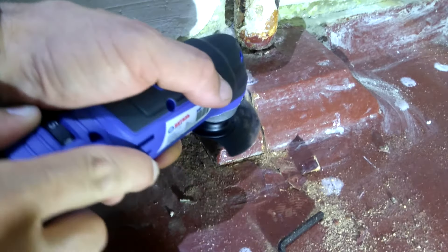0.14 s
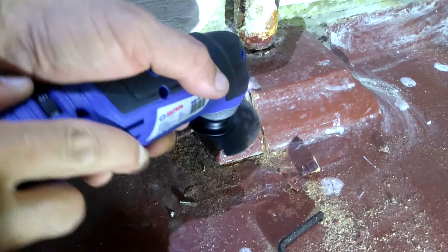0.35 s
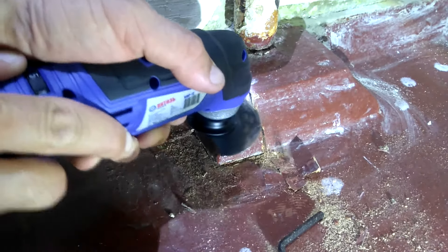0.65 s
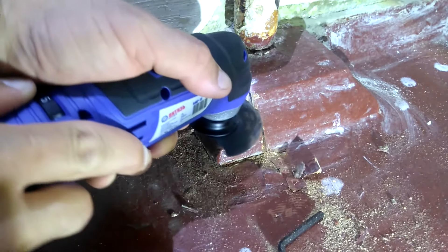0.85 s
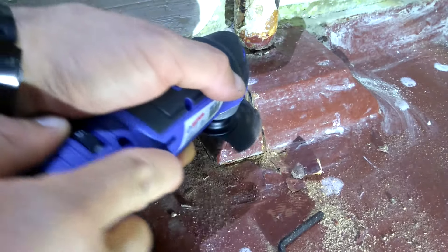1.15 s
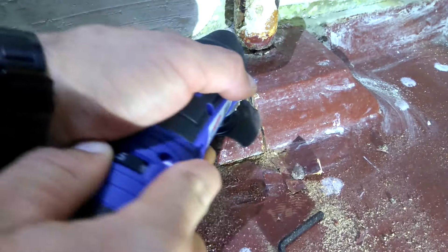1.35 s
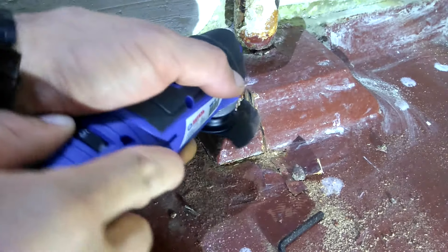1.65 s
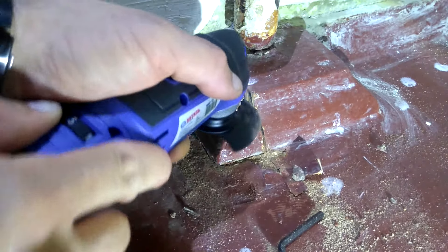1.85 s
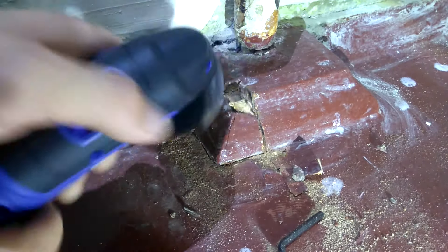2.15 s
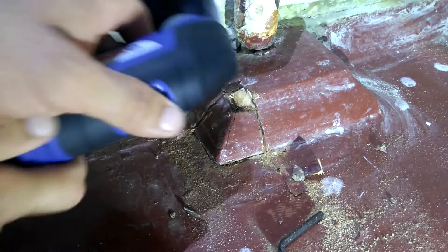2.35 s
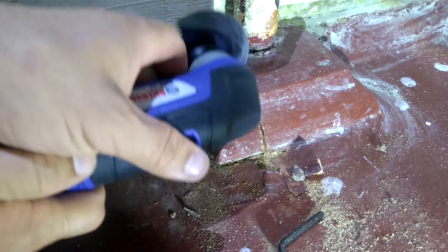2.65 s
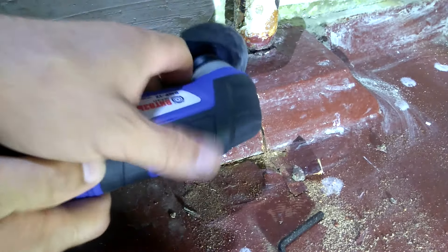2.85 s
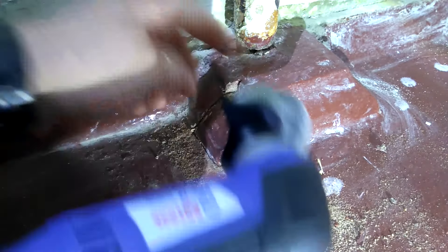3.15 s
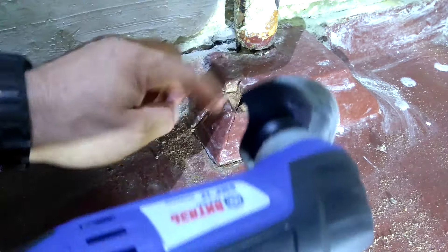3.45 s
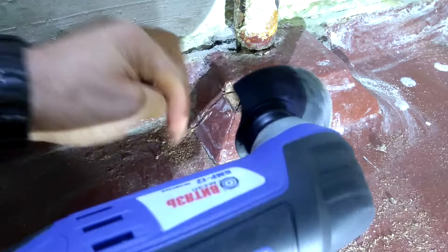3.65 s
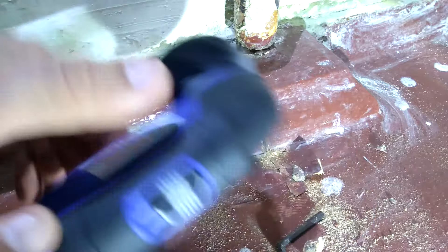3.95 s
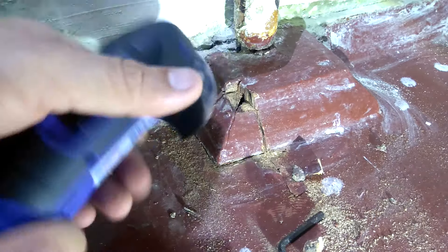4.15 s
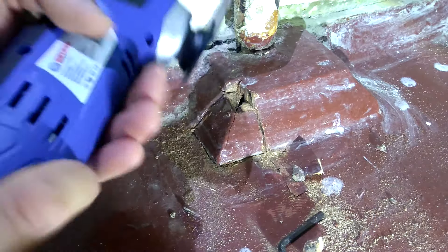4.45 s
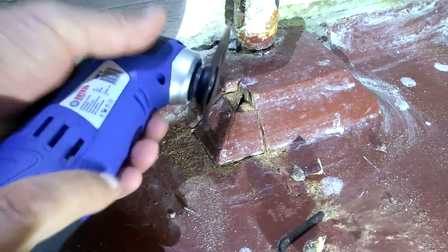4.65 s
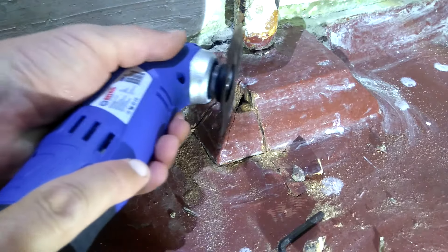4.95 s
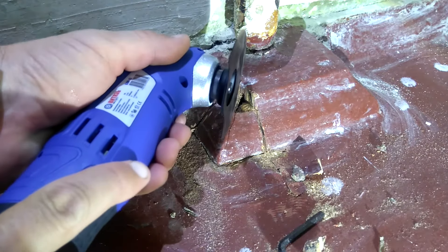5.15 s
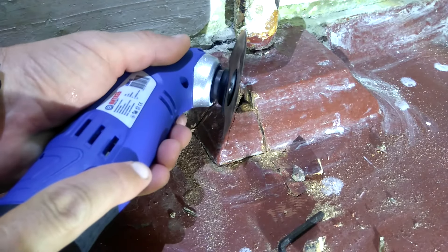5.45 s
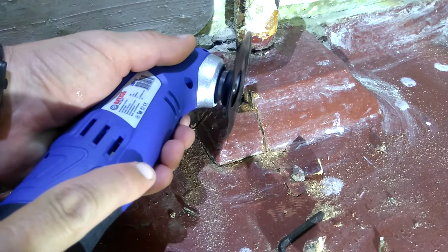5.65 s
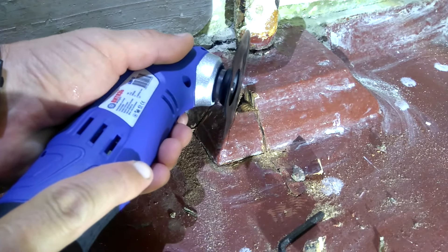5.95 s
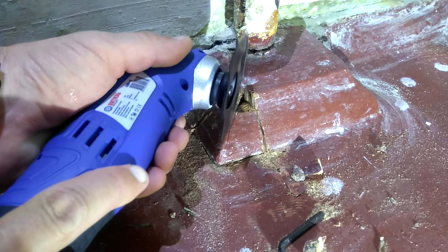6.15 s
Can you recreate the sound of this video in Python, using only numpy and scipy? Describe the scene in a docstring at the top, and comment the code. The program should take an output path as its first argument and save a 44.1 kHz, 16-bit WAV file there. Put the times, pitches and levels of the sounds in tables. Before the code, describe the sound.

Close up, a labouring power saw drones and stutters in wood for two seconds, then snaps free into a higher, steady buzz with shifting whines.

```python
"""An oscillating multi-tool, close by, saws into a floorboard: the motor sags, the blade skids, the board drones.
At about two seconds the blade lifts out with two cracks and the motor speeds up to a free buzz.
The free tool is turned over in the hands, so single tones whine; it bumps and grazes the floor now and then.
Every stroke knocks the drive gear: this gives a stack of tones at multiples of the stroke rate ("orders")
and a pulsing rattle, heard by two spaced microphones in a small bare room over a low rumble."""
import sys
import numpy as np
from scipy import signal
from scipy.fft import rfft, irfft, next_fast_len
from scipy.io import wavfile
from scipy.ndimage import uniform_filter1d

SR = 44100
rng = np.random.default_rng(int(sys.argv[2]) if len(sys.argv) > 2 else 0)


def store_pcm(level_fs):
    """Save levels as 16-bit WAV."""
    pcm = np.round(np.clip(level_fs, -1, 1) * 32767).astype(np.int16)
    wavfile.write(sys.argv[1], SR, np.atleast_2d(pcm).T)


N = 277344

# How the tool is held. Each row: time in seconds, body laid flat (0-1), blade turned on edge (0-1),
# pace of the hand movement (poses per second, before each user's own scaling).
HANDS = [(0, 0, 0, 1.81), (2.1, 0.06, 0.37, 3.62), (2.95, 0.09, 0, 2.36), (3.45, 0.86, 0.28, 1.32),
         (3.95, 0.68, 0.23, 2.13), (4.3, 0, 0.53, 2.656), (4.75, 0.5, 0.5, 1.9), (5.1, 0.17, 1, 0.97),
         (6.29, 0.58, 0.78, 1.26)]
# The five lowest orders. Each row: level in dB when free, level in dB in the wood, dB added by a skid,
# by a graze, by lying flat, by turning on edge, left-right difference in dB, left-right phase in radians.
# The levels are relative to one another.
LOW_ORDERS = [(-42, -18.5, -7.5, 2.5, 1, 4.5, -0.5, 0.74), (-43, -18, -3.5, 6, 10, 7.3, 1.5, 0.49),
              (-33, -22.5, -6, 3.9, 6, 2.196, 4.5, 0.71), (-36, -17, -3, 3.6, 12, 1.4, -2.5, 1.4),
              (-35.5, -24, -5, 8.2, 10.5, 1.6, -2, 1.44)]
# The free blade grazes the floor. Each row: start in seconds, length in seconds,
# sag of the speed in strokes per second, strength (0-1).
GRAZES = [(2.79, 0.21, 8.9, 0.75), (5.191, 0.31, 2.96, 0.24), (5.691, 0.186, 0.794, 0.56),
          (6.107, 0.3, 4.4, 0.27)]

CUTOFF_HZ = 14290
T = np.arange(N) / SR
SLOW_T = np.linspace(0, T[-1], num=3000)   # coarse times for slow changes
FFT_SIZE = next_fast_len(N + 4096)
BINS_HZ = np.maximum(np.arange(FFT_SIZE // 2 + 1) * SR / FFT_SIZE, 1)


def from_db(db):
    """Decibels to gain."""
    return 10 ** (np.asarray(db) / 20)


def rms_one(x):
    """Scale to an average strength (rms) of 1."""
    return x / np.sqrt(np.mean(x ** 2) + 1e-20)


def in_time(rows, t=T):
    """Read the columns of a table of changes at the times t."""
    s, *columns = np.transpose(rows)
    return [np.interp(t, s, c) for c in columns]


def at_hz(points, hz):
    """Read a spectrum on a log-frequency axis."""
    points_hz, values = np.transpose(points)
    return np.interp(np.log(hz), np.log(points_hz), values)


def wander(travel):
    """Smooth random curve of spread 1 that reaches a new value for each unit of travel."""
    knots = rng.standard_normal(4096)
    step = travel.astype(int)
    turn = (travel - step) * np.pi / 2
    ease = np.sin(turn) ** 2 * np.pi / 2
    return knots[step % len(knots)] * np.cos(ease) + knots[(step + 1) % len(knots)] * np.sin(ease)


def filtered(x, gain):
    """Apply a gain per frequency."""
    return irfft(rfft(x, FFT_SIZE) * gain, FFT_SIZE)[..., :N]


def noise(colour):
    """Stereo noise of a given colour and rms 1; how alike its two sides are depends on the frequency."""
    # Likeness of noise at the two microphones. Each row: frequency in Hz, likeness (-1 to 1).
    likeness = [(60, -0.013), (140, -0.63), (300, 0.9), (630, 1), (1370, -0.63), (3000, -0.61),
                (6500, -0.019), (14000, 0.19)]
    mid, side = rng.standard_normal((2, N))
    gain = from_db(at_hz(colour, BINS_HZ))
    alike = np.clip(at_hz(likeness, BINS_HZ), -1, 1)
    shared = filtered(mid, gain * np.sqrt(1 + alike))
    opposed = filtered(side, gain * np.sqrt(1 - alike)) * [[1], [-1]]
    return rms_one(shared + opposed)


def partial(rotor, slow_gains):
    """A stereo tone from a unit rotor and a slowly moving complex rms gain for each side."""
    return np.sqrt(2) * np.array([(rotor * np.interp(T, SLOW_T, g)).real for g in slow_gains])


def flutter(share, slow_rate, fast_rate, fast_share):
    """Complex gain of one tone: steady, except for a share of its power that trembles from uneven strokes."""
    share, fast_share = np.clip(share, 0, .95), np.clip(fast_share, 0, 1)

    def tremble(rate):
        real = wander(SLOW_T * rate + rng.random())
        imaginary = wander(SLOW_T * rate + rng.random())
        return (real + 1j * imaginary) / np.sqrt(2)

    mixed = np.sqrt(1 - fast_share) * tremble(slow_rate) + np.sqrt(fast_share) * tremble(fast_rate)
    return np.sqrt(1 - share) + np.sqrt(share) * mixed


def resonance_db(rings, hz):
    """Lift in dB that a set of resonances gives to a tone."""
    return sum(db / (1 + (2 * (hz - centre) / width) ** 2) for centre, width, db in rings)


def gate(t, start, length, fade):
    """1 for the length of an event, with straight fades centred on its ends."""
    return np.clip(np.minimum(t - start, start + length - t) / fade + .5, 0, 1)


def stroke_rate(t):
    """Strokes per second; each graze drags the motor down, and it recovers."""
    # The motor labours in the cut, then speeds up as it is lifted.
    # Each row: time in seconds, strokes per second.
    cut_speed = [(0.0, 201.8), (0.12, 190.5), (0.37, 192.8), (0.5, 182.4), (0.65, 180.6), (0.7, 179.0),
                 (0.79, 167.7), (0.86, 178.8), (1.07, 185.5), (1.16, 191.7), (1.32, 185.6), (1.41, 187.8),
                 (1.49, 184.9), (1.63, 165.7), (1.73, 177.7), (1.77, 174.9), (1.81, 175.2), (1.85, 183.0),
                 (2.09, 237.4), (2.17, 241.5)]
    # The motor without load, before the grazes. Each row: time in seconds, strokes per second.
    free_speed = [(2.2, 242.3), (2.43, 243.1), (3.0, 242.2), (5.0, 244.2), (6.29, 244.0)]
    sag_share = 0.419   # share of a graze for which the motor is slowing
    speed, = in_time(list(cut_speed) + list(free_speed), t)
    for s, length, sag, _ in GRAZES:
        speed = speed - np.interp(t, [s, s + sag_share * length, s + length], [0, sag, 0])
    return speed


def sunk(t, lift_s=1.849, lift_takes_s=0.28):
    """How deep the blade is in the wood, 1 to 0, as it is drawn out of the cut."""
    return np.clip(1 - (t - lift_s) / lift_takes_s, 0, 1)


def grazing(t, fade_s=0.031):
    """How hard the free blade touches the floor."""
    return sum(strength * gate(t, s, length, fade_s) for s, length, _, strength in GRAZES)


def chatter(t, free=0.2, sawing=0.32, lifting=0.46, full_graze=0.59):
    """Roughness (0-1): the blade chatters most when it only half touches the wood."""
    depth = sunk(t)
    rough = free + sawing * depth + lifting * np.sin(np.pi * depth) + full_graze * grazing(t)
    return np.clip(rough, .01, .99)


def contact_level(levels, t, skid_fade_s=0.11):
    """Level in dB of one part of the sound, from what the blade is doing and how the tool is held."""
    # The teeth lose their bite and skid in the cut.
    # Each row: start in seconds, length in seconds, strength (0-1).
    skids = [(0.263, 0.45, 0.3), (.78, 0.37, 0.89), (1.263, 0.29, 0.27), (1.566, 0.3, 0.45),
             (1.886, 0.12, 0.54)]
    free_db, wood_db, skid_db, graze_db, flat_db, edge_db = levels
    skidding = sum(strength * gate(t, s, length, skid_fade_s) for s, length, strength in skids)
    flat, on_edge, _ = in_time(HANDS, t)
    blade_db = free_db + (wood_db - free_db) * sunk(t) + skid_db * skidding + graze_db * grazing(t)
    return blade_db + flat_db * flat + edge_db * on_edge


def gear_lines(turns, sway_db=1.28, side_sway_db=2.5, sway_rad=0.57, mic_lag_s=0.000311,
               tremble=0.9, treble_tremble=0.67, fast_share=0.51, count=60):
    """Upper orders; echoes off floor and hands make each swell and fade as the tool moves."""
    # The free gear head favours some orders. Each row: order, relative level in dB.
    favoured = [(6, 1), (7, 0.5), (8, -2), (9, -4), (10, -0.5), (11, -2.5), (12, 2), (13, 0), (14, 1.5),
                (15, 1.5), (16, 1), (17, -3.5), (18, -1), (19, -2.5), (20, -4.5), (21, 2.5), (22, 0.5),
                (23, -1.5), (24, -0.5), (25, -7)]
    # Colour of the gear tones. Each row: frequency in Hz, relative level in dB.
    colour = [(1000, 5.5), (5700, 0.5), (6500, -11.5), (7600, -8.5), (9000, -8.5), (11400, -16.5),
              (13000, -14), (14200, -10.5)]
    # Sharp rings of the steel blade. Each row: frequency in Hz, width in Hz, lift in dB.
    blade_rings = [(5190, 460, 0), (9730, 50, -8), (10630, 320, 8.5), (14700, 290, 10)]
    speed, in_wood, rough = stroke_rate(SLOW_T), sunk(SLOW_T), chatter(SLOW_T)
    *_, movement = in_time(HANDS, SLOW_T)
    travel = np.cumsum(1.8 * movement + 4 * in_wood) * SLOW_T[1]
    step = np.exp(2j * np.pi * turns)
    rotor, out = step ** len(LOW_ORDERS), 0
    for row, order in enumerate(range(len(LOW_ORDERS) + 1, count)):
        rotor = rotor * step
        hz = order * speed
        pose = travel + rng.random()
        ring_db = resonance_db(blade_rings, hz)
        if row < len(favoured):
            ring_db += favoured[row][1]
        # the wood damps the sharp rings
        level_db = at_hz(colour, hz) + (1 - in_wood) * ring_db + sway_db * wander(pose)
        # the sound reaches the left microphone later; short waves scatter and tremble more
        angles = 2 * np.pi * (rng.random() - hz * mic_lag_s * np.array([[1], [0]]))
        scatter = sway_rad * np.minimum(hz / 2000, 2)
        unsteady = tremble * rough + treble_tremble * hz / CUTOFF_HZ
        fast = fast_share * unsteady * np.minimum(hz / 3000, 1)
        gains = []
        for angle in angles:
            side_gain = from_db(level_db + side_sway_db * wander(pose))
            phase = np.exp(1j * (angle + scatter * wander(pose)))
            gains.append(side_gain * phase * flutter(unsteady, 28, 120, fast))
        out = out + partial(rotor, gains)
    return rms_one(out)


def rattle(turns, in_wood, pulse_depth=.25, return_depth=.15, stroke_spread_db=2.0):
    """Gear rattle and tearing fibres come in a burst on each stroke and a weaker one on its return."""
    # Noise colour of sawing. Each row: frequency in Hz, relative level in dB per Hz.
    sawing_colour = [(200, -22), (600, -22), (1200, 1), (2000, 8.5), (3800, 7), (5500, 4), (6300, -2),
                     (9000, -4), (11500, -6.5), (14200, -13.5)]
    # Noise colour of the free gear. Each row: frequency in Hz, relative level in dB per Hz.
    gear_colour = [(200, -26), (900, -3), (1500, -10), (2300, -4), (3000, 5), (5300, 0.5), (6400, -7.5),
                   (8000, -3.5), (10600, -5.5), (11700, -14), (13000, -6), (14200, -22)]
    angle = 2 * np.pi * turns
    bursts = np.exp(pulse_depth * np.cos(angle) + return_depth * np.cos(2 * angle))
    bursts = bursts * from_db(stroke_spread_db * wander(2 * turns))
    sawing = np.sqrt(in_wood) * noise(sawing_colour)
    free_gear = np.sqrt(1 - in_wood) * noise(gear_colour)
    return rms_one(bursts) * (sawing + free_gear)


def radiate(drive, waver_db=.5, waver_rate=24, swell_db=0.46, swell_rate=9, size=6615):
    """Each part of the tool sounds its own range of the drive at its own, slightly wavering loudness."""
    # Ringing parts, low to high: plastic shell, gear head, blade, teeth.
    # Each row: level in dB when free, level in dB in the wood, dB added by a skid, by a graze,
    # by lying flat, by turning on edge.
    parts = [(-20.5, -17.5, 1, 5, -0.5, -0.5), (-19.5, -17.5, 1.2, 4, 4, 0.85),
             (-15, -25.5, 5.5, 0.5, -2, -2), (-19, -28.5, 7.5, -5.5, -1.7, 3)]
    # Lower border of each part's range, in Hz.
    edges_hz = [980, 2300, 4200, 6200]
    above = [1 / (1 + (edge / BINS_HZ) ** 20) for edge in edges_hz] + [0]
    out = 0
    for k, levels in enumerate(parts):
        level_db = np.interp(T, SLOW_T, contact_level(levels, SLOW_T))
        # the higher parts beam more, and swell and fade as the hand sways
        level_db = level_db + swell_db * k * wander(T * swell_rate + rng.random())
        level_db = level_db + waver_db * wander(T * waver_rate)
        part = filtered(drive, above[k] - above[k + 1])
        # even out the part's own loudness (over size samples), so the level alone sets it
        power = uniform_filter1d(np.mean(part ** 2, axis=0), size)
        out = out + from_db(level_db) * part / np.sqrt(power + 1e-12)
    return out


def shake(turns, sway_db=0.24, sway_rad=0.44, tremble=0.17):
    """The lowest orders of the stroke, loud while the board acts as a soundboard."""
    # Resonances of the floorboard that the low orders sweep across.
    # Each row: frequency in Hz, width in Hz, lift in dB.
    board_rings = [(352, 9.2, 4.5), (384.6, 13.3, 6), (403.3, 14.3, 1.5), (495, 18, 12), (582, 44, 5),
                   (931, 45, 9)]
    speed, in_wood, rough = stroke_rate(SLOW_T), sunk(SLOW_T), chatter(SLOW_T)
    *_, movement = in_time(HANDS, SLOW_T)
    travel = np.cumsum(movement + 4 * in_wood) * SLOW_T[1]
    sides, out = np.array([[.5], [-.5]]), 0
    for k, (*levels, pan_db, lag) in enumerate(LOW_ORDERS):
        order = k + 1
        level_db = contact_level(levels, SLOW_T) + in_wood * resonance_db(board_rings, order * speed)
        level_db = level_db + sway_db * wander(travel + rng.random()) + sides * pan_db
        angle = sides * (lag + sway_rad * k * wander(travel))
        uneven = flutter(tremble * (order + 1) * rough ** 2 + 0.041, 26, 110, 0.1)
        gains = from_db(level_db) * np.exp(1j * angle) * uneven
        out = out + partial(np.exp(2j * np.pi * order * turns), gains)
    return out


def board_ring(x, ring_hz=352.3, t60_s=0.85, top_db=-1):
    """The octave of the stroke sweeps over the board's resonance, which then rings on by itself."""
    r = from_db(-60 / (t60_s * SR))   # what is left of the ring after one sample
    w = 2 * np.pi * ring_hz / SR
    ring = signal.lfilter([0, 2 * (1 - r) * np.sin(w)], [1, -2 * r * np.cos(w), r * r], x)
    return from_db(top_db) * ring


def whines(turns, side_sway_db=4.0, sway_rate=6, tremble=0.068, fade_s=0.23):
    """Single gear orders swell and fade, in a different phase at each microphone."""
    # As the tool is turned, single orders point at the microphones and whine.
    # Each row: start in seconds, length in seconds, order, level in dB.
    whine_list = [(2.156, 0.16, 11, -17.5), (2.202, 0.34, 13, -17.5), (2.548, 0.25, 8, -23.5),
                  (2.558, 0.25, 22, -41), (3.025, 0.24, 13, -17), (3.126, 0.1, 17, -26),
                  (3.3, 2, 21, -20.5), (3.502, 0.41, 22, -20.5), (3.48, 1, 11, -20.5),
                  (4.165, 0.38, 11, -20), (4.137, 0.17, 10, -20.5), (4.27, 0.22, 8, -18.5),
                  (4.668, 0.41, 18, -25.5), (4.662, 0.085, 14, -14), (4.792, 0.35, 19, -26),
                  (4.964, 0.23, 44, -20), (5.322, 0.25, 15, -21), (5.9, 0.37, 21, -18)]
    out = 0
    for s, length, order, db in whine_list:
        swell = from_db(db) * gate(SLOW_T, s, length, fade_s) * flutter(tremble, 28, 120, 0.65)
        gains = []
        for phase in rng.random(2):
            side_sway = from_db(side_sway_db * wander(SLOW_T * sway_rate))
            gains.append(swell * side_sway * np.exp(2j * np.pi * phase))
        out = out + partial(np.exp(2j * np.pi * round(order) * turns), gains)
    return out


def snaps(decay_s=0.001):
    """Very short bright cracks: bursts of noise that start at once and die away."""
    # Splinters snap as the blade leaves the cut. Each row: time in seconds, relative strength in dB.
    snap_list = [(1.988, -6), (2.103, 5)]
    envelope = sum(from_db(db) * (T >= s) * np.exp(-np.abs(T - s) / decay_s) for s, db in snap_list)
    return envelope * rng.standard_normal((2, N)) / 2


def bumps(strike_spread_db=0.6):
    """Every soft bump sets each mode ringing with a strength of its own; low modes take longer to build up."""
    # The vibrating tool bumps against the floor. Each row: time in seconds, strength in dB.
    bump_list = [(2.801, -23), (2.852, -18), (2.87, -16), (2.9, -22)]
    # What a bump rings with. Each row: frequency in Hz, relative level in dB,
    # time to fade by 60 dB in seconds.
    modes = [(231, 0, 0.13), (450, -10, 0.085), (716, -6, 0.059), (1450, -14, 0.044), (1680, 0, 0.022)]
    out = np.zeros(N)
    age = T[:SR // 4]
    for s, bump_db in bump_list:
        start = int(s * SR)
        for hz, db, t60 in modes:
            strike_db = bump_db + db + strike_spread_db * rng.standard_normal()
            build_up = 1 - np.exp(-(age * hz) ** 2)
            envelope = from_db(strike_db - 60 * age / t60) * build_up
            out[start:start + len(age)] += envelope * np.sin(2 * np.pi * hz * age)
    return out


def room(x, wet_db=-14, t60_s=1.0, first_echo_s=0.0086):
    """A small bare room: a dense tail, unrelated at the two microphones."""
    age = T[:SR // 2]
    echoes = rng.standard_normal((2, len(age))) * from_db(-60 * age / t60_s) * (age > first_echo_s)
    tail = rms_one(echoes) / np.sqrt(len(age))
    return from_db(wet_db) * signal.fftconvolve(x, tail, axes=1)[:, :N]


def low_rumble(in_wood, rough, wood_db=-30, free_db=-41.5, chatter_db=5):
    """Low noise, stronger while the blade is in the wood and when it chatters."""
    # Noise colour of the rumble. Each row: frequency in Hz, relative level in dB per Hz.
    rumble_colour = [(20, -21), (45, -11), (110, -8), (230, -6), (500, -2), (900, 1.5), (1150, -2.5),
                     (1500, -38)]
    level_db = in_wood * wood_db + (1 - in_wood) * free_db + chatter_db * (rough - 1.0)
    return from_db(level_db) * noise(rumble_colour)


def scene(jitter_turns=0.0065, jitter_hz=70, rattle_share=0.77, rattle_power=1.11, shake_db=-0.93):
    """One crank drives the tool's sounds; chatter makes its strokes uneven and trades tones for rattle."""
    speed, in_wood, rough = stroke_rate(T), sunk(T), chatter(T)
    turns = np.cumsum(speed) / SR + jitter_turns * rough * wander(T * jitter_hz)
    noisy = np.clip(rattle_share * rough ** rattle_power, 0, 1)
    drive = np.sqrt(1 - noisy) * gear_lines(turns) + np.sqrt(noisy) * rattle(turns, in_wood)
    drone = from_db(shake_db) * shake(turns)
    near = radiate(drive) + whines(turns) + drone + board_ring(drone) + bumps() + snaps()
    return near + room(near) + low_rumble(in_wood, rough)


def record(dry, treble_tilt_db=2.0, ceiling=0.58):
    """The right microphone is brighter, the highest peaks are rounded, the top is cut."""
    tilt = treble_tilt_db / (1 + (6500 / BINS_HZ) ** 12)
    heard = filtered(dry, from_db(tilt * np.array([[-1], [1]])))   # left duller, right brighter
    rounded = heard / (1 + (heard / ceiling) ** 6) ** (1 / 6)
    return filtered(rounded, 1 / (1 + (BINS_HZ / CUTOFF_HZ) ** 500))


dry = scene()
out = record(dry)
store_pcm(out)
```